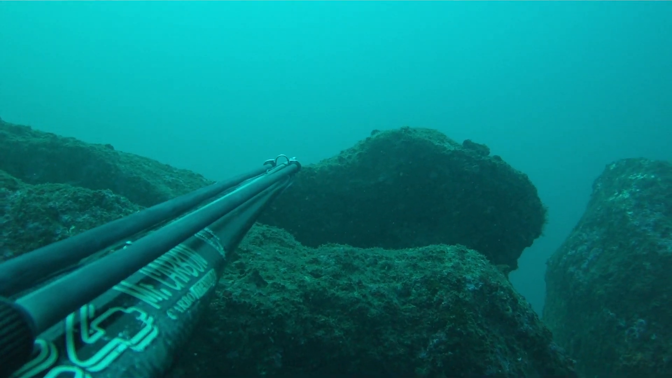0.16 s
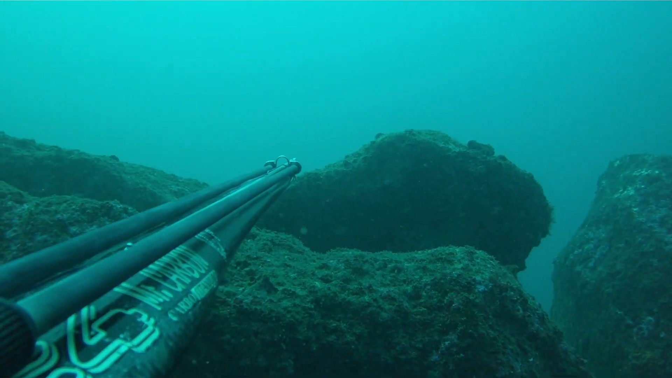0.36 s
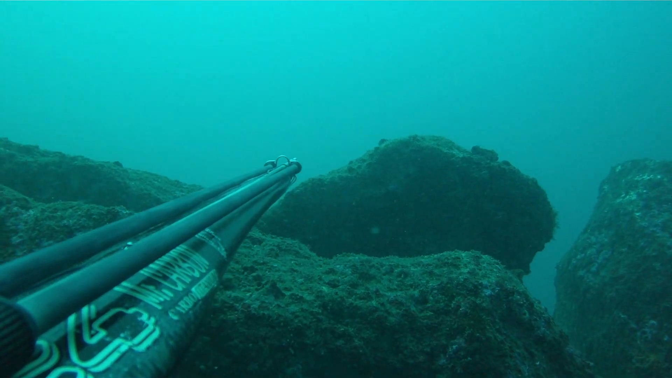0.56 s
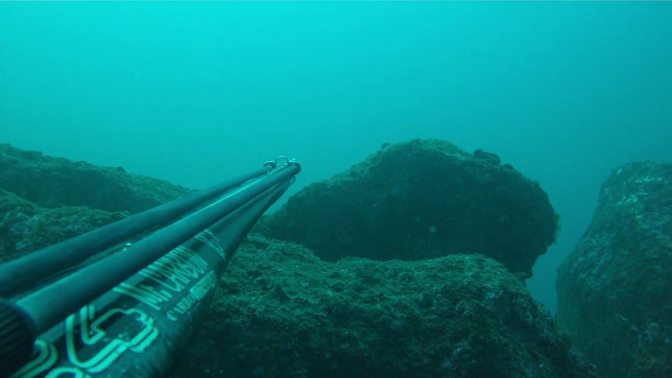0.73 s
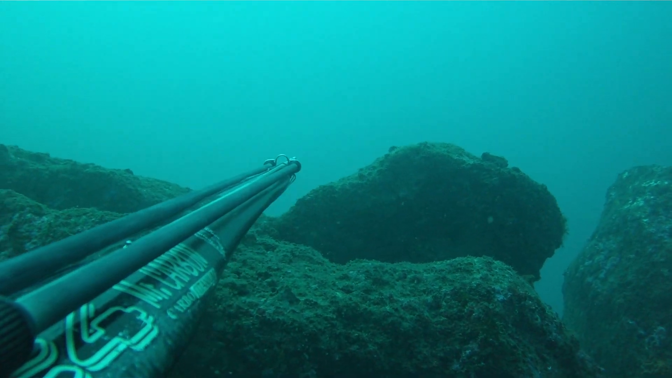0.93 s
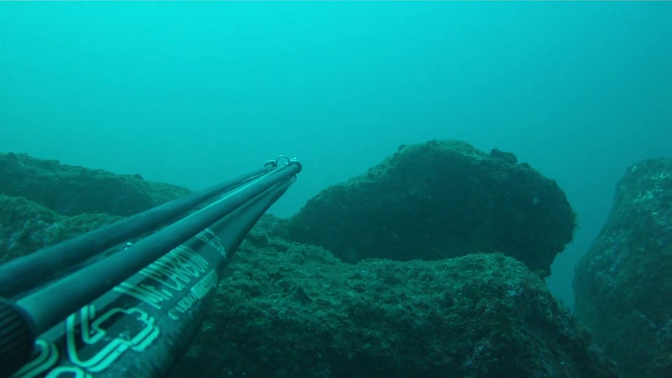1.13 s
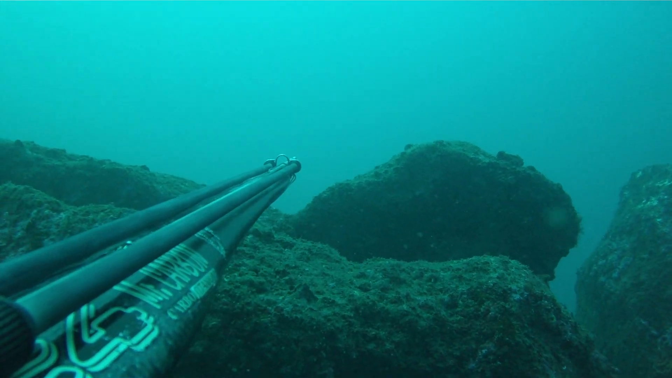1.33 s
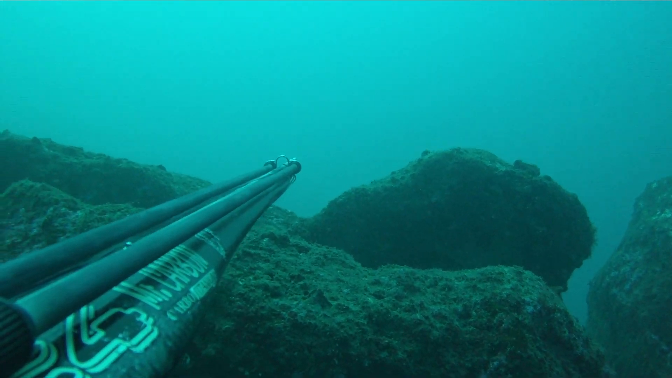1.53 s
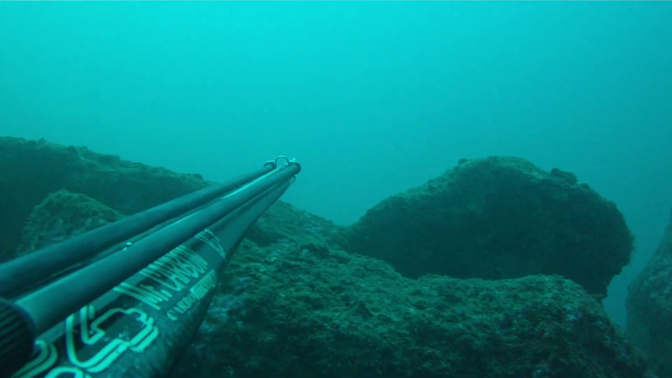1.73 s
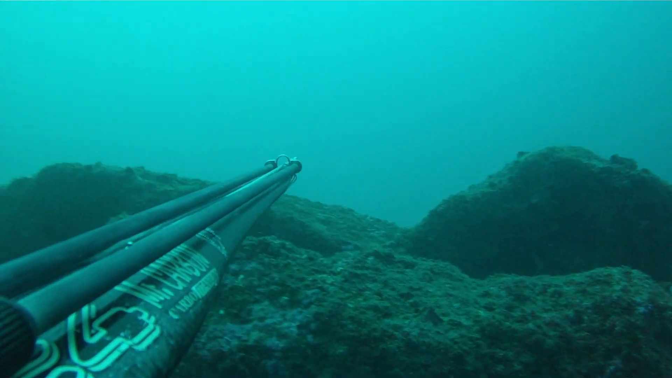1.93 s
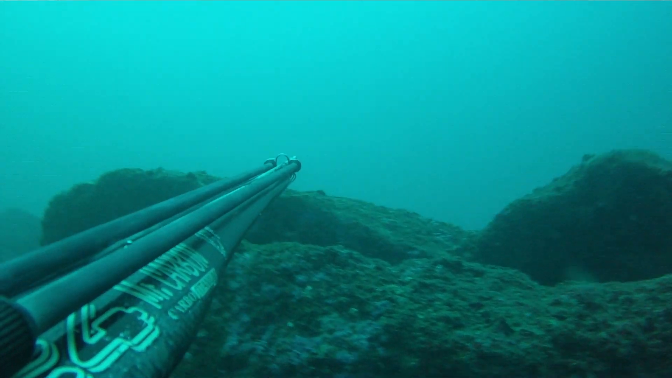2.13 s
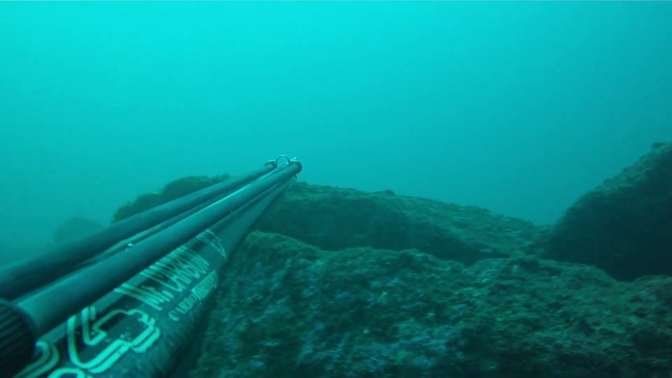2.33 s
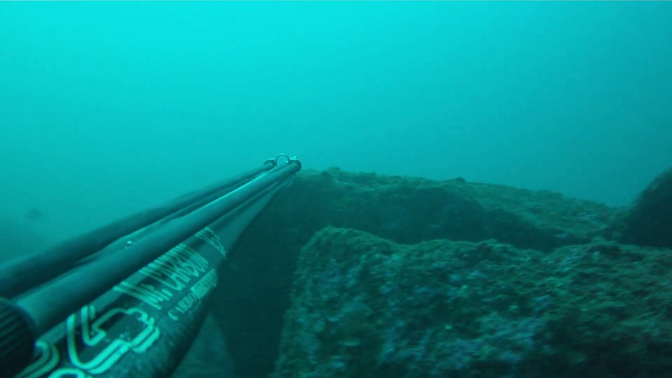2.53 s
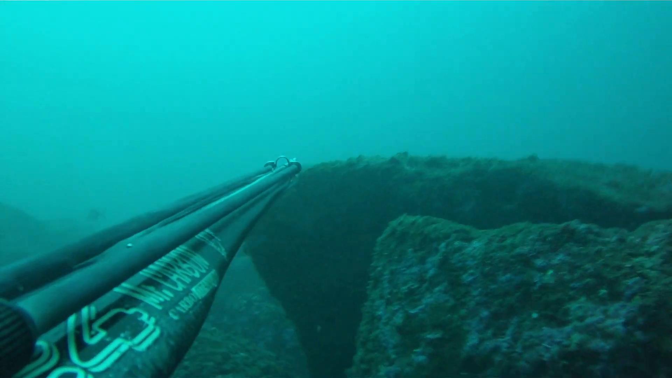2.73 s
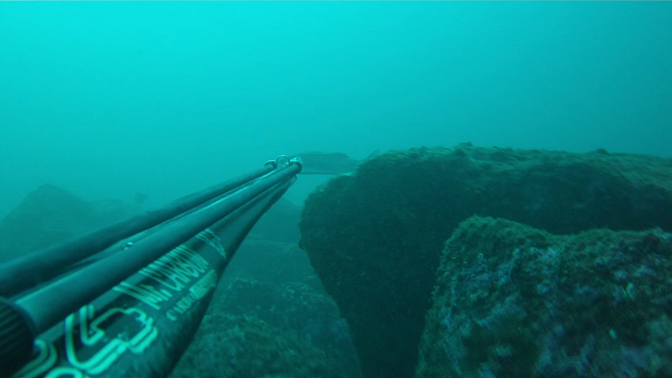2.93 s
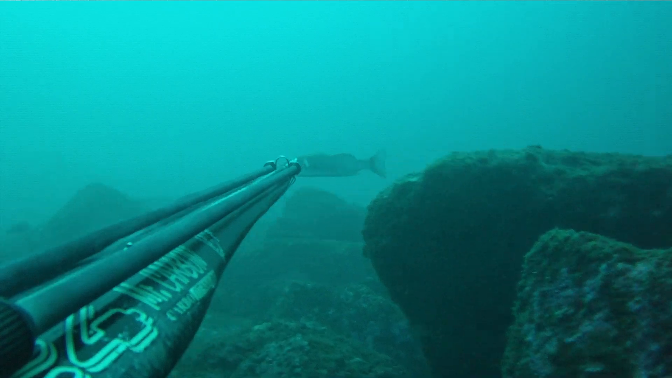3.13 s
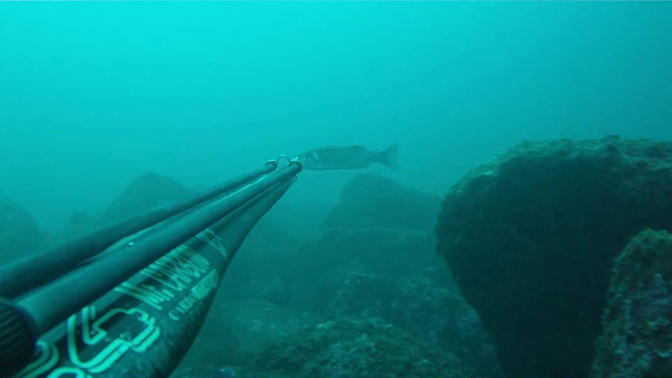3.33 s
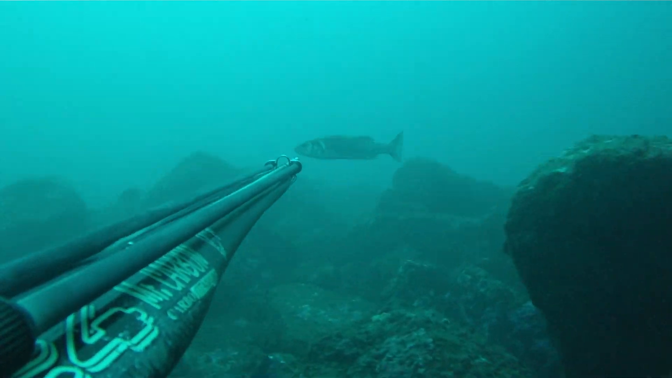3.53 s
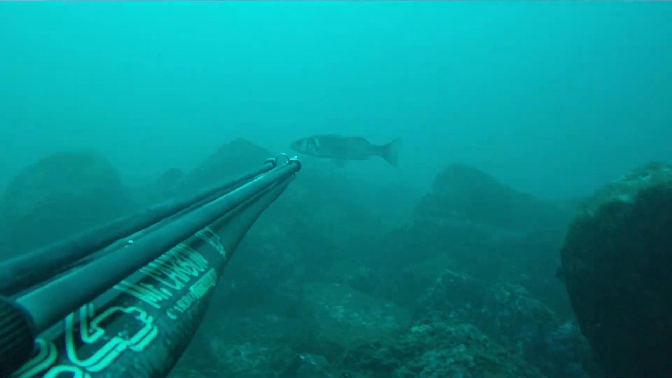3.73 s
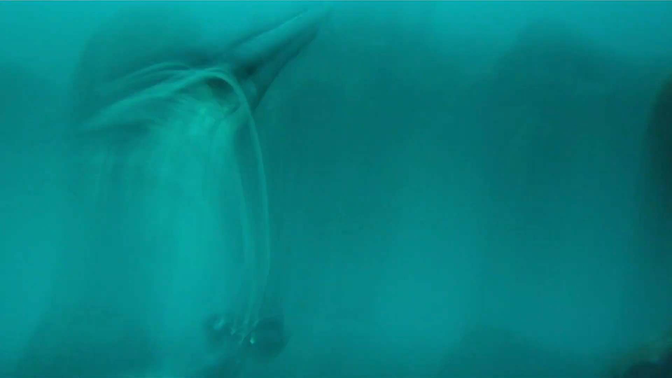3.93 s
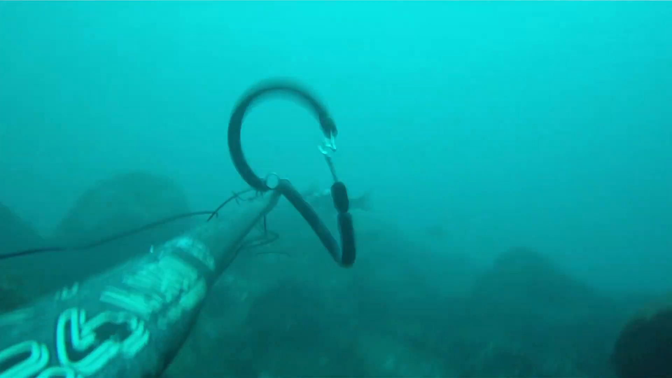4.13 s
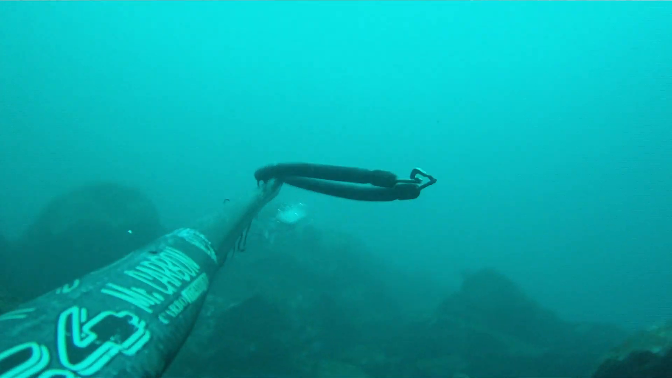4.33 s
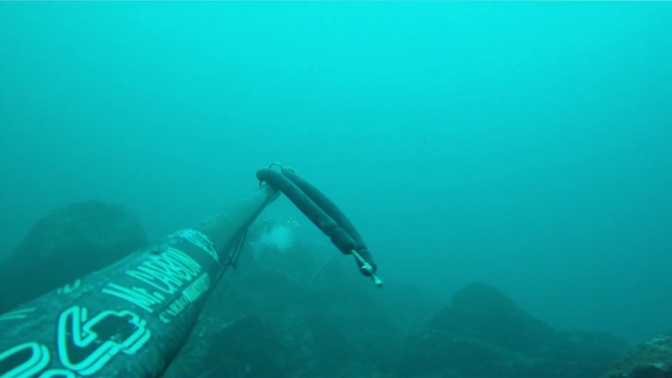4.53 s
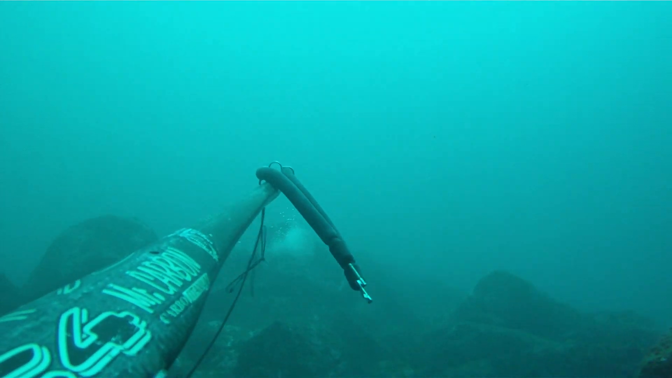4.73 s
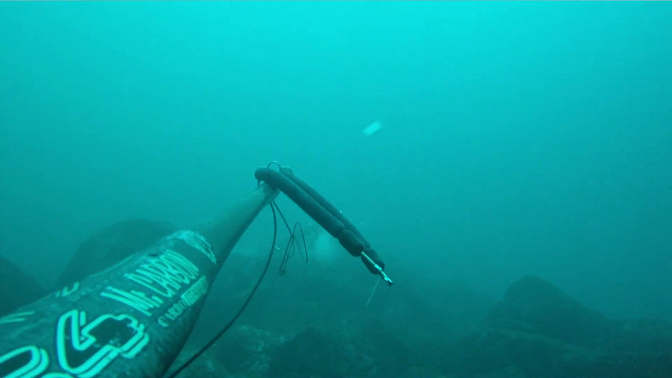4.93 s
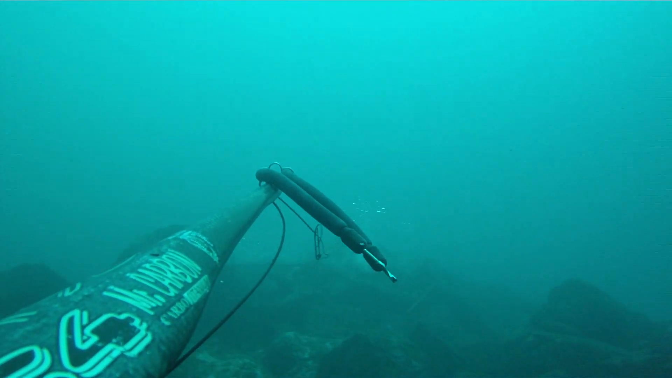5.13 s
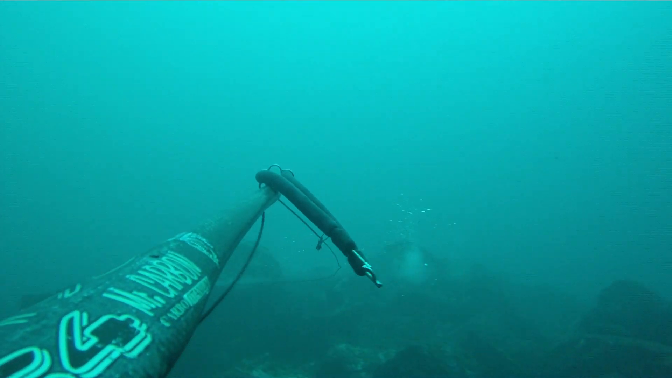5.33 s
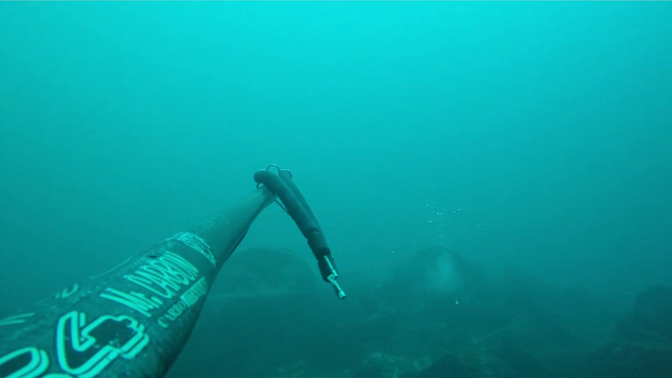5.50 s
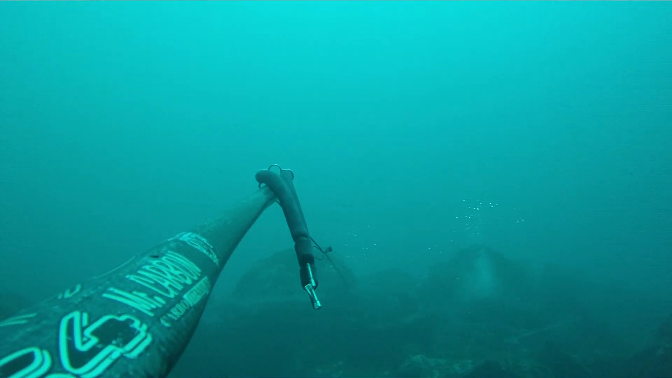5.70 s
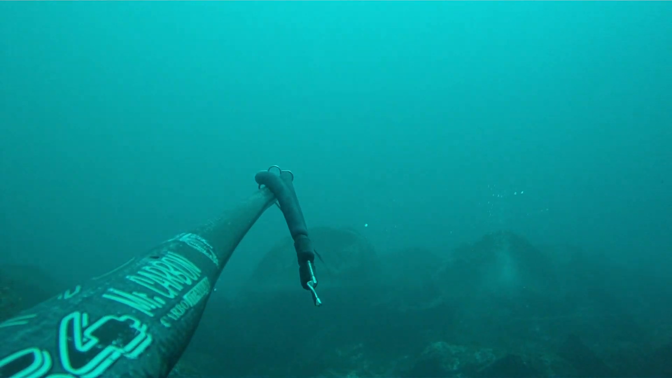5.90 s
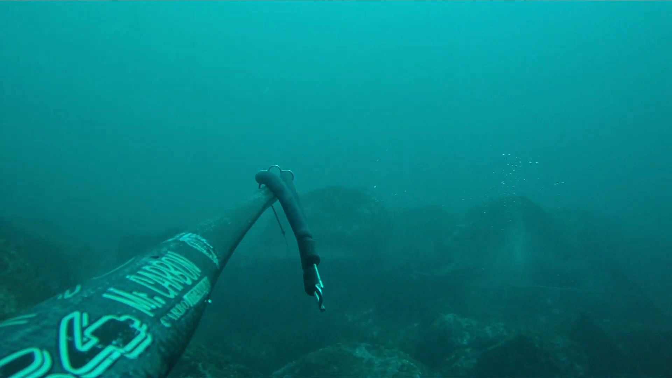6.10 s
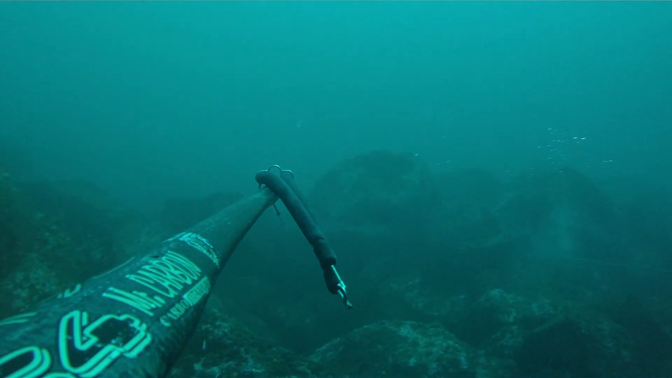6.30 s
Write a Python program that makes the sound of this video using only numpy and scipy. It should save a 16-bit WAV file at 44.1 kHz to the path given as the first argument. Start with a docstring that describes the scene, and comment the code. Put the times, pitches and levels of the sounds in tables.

```python
"""Over a rocky reef, inside a sealed camera housing fixed to a speargun that is aimed and fired.
Flickering sea hiss is noise coloured by the housing resonances; shrimp snaps are clicks into very short modes.
The mount's knocks and ticks are rough contacts that ring the housing, over soft thuds, rumble and electronic noise.
The shot overloads the microphone, which cuts in and out for a fifth of a second; the loudest knocks clip."""
import sys
import numpy as np
from scipy import signal
from scipy.fft import rfft, irfft
from scipy.io import wavfile
from scipy.ndimage import uniform_filter1d

SR = 44100
rng = np.random.default_rng(int(sys.argv[2]) if len(sys.argv) > 2 else 0)


def master(y):
    """Save y as 16-bit WAV."""
    cut = np.clip(np.atleast_2d(y).T, -1, 1)
    pcm = np.round(cut * 32767)  # scale
    wavfile.write(sys.argv[1], SR, pcm.astype(np.int16))


N = 284886

# Table levels are those before the treble notch of the microphone port.
# background settings: (time [s], sea hiss [dB], sea treble [dB], electronic hiss [dB]);
# the last two are settings that their sources offset
BACKGROUND = [(0, -39, -51.5, -64), (1.15, -38.5, -51, -63.5), (1.7, -35.5, -55, -65.5),
              (2.05, -36.5, -55, -64.5), (2.3, -38.5, -56, -68), (3.3, -39, -64.5, -73),
              (3.4, -40, -57.5, -73.5), (3.75, -35.5, -53.5, -70), (3.92, -37.5, -60.5, -82.5),
              (4.7, -37, -59.5, -87.5), (5.18, -41.5, -60, -80), (5.3, -38.5, -56.5, -74),
              (5.6, -36.5, -51, -66), (6.46, -33.5, -49, -63.5)]
# colour of the sea noise: (frequency [Hz], relative level per Hz [dB])
SEA_COLOUR = [(200, -41.5), (400, -14), (600, -17), (900, -5.5), (1200, 3.5), (1700, -1.5), (2050, -30.5),
              (2400, -29), (3100, -37.5), (4500, -32.5), (6000, -28.5), (7000, -39), (8500, -65)]
# housing resonances heard in the sea noise: (frequency [Hz], width [Hz], lift [dB])
SEA_PEAKS = [(820, 22, 4.5), (1259, 49, 11), (1252, 8.5, 5), (1570, 65, 9), (1753, 330, 12),
             (2272, 120, 10.5), (2953, 220, 9), (3750, 970, 5.5), (5470, 160, -4.5)]
# nearest shrimp snaps: (time [s], strength before the modes ring [dB])
NEAR_SNAPS = [(0.011, -35.5), (0.3294, -38.5), (0.6298, -33), (0.756, -40.5), (0.8366, -39), (0.9949, -40),
              (1.1703, -38.5), (1.2117, -29), (2.0398, -36.5), (2.095, -40), (4.824, -38), (5.7718, -35),
              (5.806, -42), (5.8811, -37.5), (5.9244, -38), (6.202, -39)]
# short ringing of every snap: (frequency [Hz], level [dB], 60 dB decay [s])
SNAP_MODES = [(2180, 5.5, 0.002), (3780, -2.5, 0.011), (5210, 4, 0.0033), (6340, -12.5, 0.0028)]
# knocks on the housing: (time of the strongest part [s], peak of the ringing [dB], contact length [ms],
# lift of the modes below and above the middle ones [dB])
KNOCKS = [(0.0083, -19.5, 21, 0), (0.0337, -16.5, 3.5, -2), (0.058, -23, 6.2, -6), (0.3774, -13.5, 10, -8),
          (0.545, -25, 7.6, -5.5), (0.7339, -22, 13, 1), (0.8718, -15.5, 4.6, -1), (0.8964, -21, 7, -4),
          (1.226, -7.5, 9.8, 9), (1.2487, -3.5, 4.4, -7), (1.3129, 0, 7.4, 2), (1.4423, -5, 6, -5.5),
          (1.5646, -9.5, 11, -0.5), (1.602, -16, 13, 9), (1.6423, 0, 3.9, -4.5), (1.6745, -13.5, 5.3, 11),
          (1.691, -0.5, 4.9, -3), (1.7349, -14, 3.2, 11), (1.746, 3, 8, 11.5), (1.8268, -8.5, 4.1, -1),
          (1.8346, -17.5, 15, 3), (1.8705, -8, 4.7, -12), (1.897, -20, 5.6, -1), (1.9474, -15, 12, 6),
          (1.9779, -4.0, 5.6, -14), (2.0697, -16, 29, -4), (2.126, -6, 8, -4), (2.1356, 4, 2.3, -3),
          (2.1426, -2, 2.85, 0.5), (2.1862, 5.0, 8, 6.5), (2.2366, -16, 10, -7), (2.2508, 3, 8.4, -1.5),
          (2.2595, -17, 21, -6), (2.2965, 0.5, 13, 0), (2.3344, -9.5, 6.6, 4), (2.3389, -11, 21, -2),
          (2.355, -7, 2.9, -1), (2.385, -8.5, 9.9, 2), (2.4227, 2, 10.3, 2.5), (2.464, -20, 5.3, 5),
          (2.478, -4.5, 18.2, -5), (2.528, -8.5, 9.7, -1), (2.5375, -7, 8.7, 2), (2.5634, -21, 17, -2.5),
          (2.5954, -6.5, 11.3, -2), (2.6315, -0.5, 14.7, -5), (2.6448, -4, 16.6, -3), (2.687, 0.5, 9.9, 8),
          (2.7393, -0.5, 8.6, -10.5), (2.7842, -7.5, 9.1, 4), (2.8229, 2.5, 9.8, 3), (2.8693, 0, 6.9, 10.5),
          (2.9296, -11, 3.9, 4), (2.962, -9.5, 6.8, 10), (2.9756, -5, 6.6, -4), (3.0073, 6.5, 6.34, 11),
          (3.044, -2.5, 3.8, -3), (3.0536, -12, 13, 15), (3.0852, 4, 9.9, 2), (3.1367, -7.5, 7, 8),
          (3.1771, -10.5, 8, -1), (3.189, 0.5, 4.1, 7.5), (3.2256, -7, 8.8, -4), (3.2683, 5, 10.8, 4.5),
          (3.3178, 0.5, 10.5, 4.5), (3.5096, -12, 6.9, -1.5), (3.5537, -3.5, 6.1, -2), (3.592, -7, 13, -6),
          (3.6104, -12, 7.0, -6), (3.6484, -4, 9, 7), (3.6841, -13, 5.1, -8), (3.698, -8.5, 6.8, -5),
          (3.7475, 1, 8.4, 4.5), (3.7832, 1, 8, 5.5), (3.8317, 1.5, 9.3, 12.5), (3.8722, 1.0, 8.8, 5),
          (3.9815, -5.5, 4.6, -2), (4.0125, -11.5, 5.9, -10.5), (4.2514, -1, 4.4, -6),
          (4.3175, -10.5, 7.1, -0.5), (4.377, -8, 5.4, -12), (4.383, 1.5, 9.3, -1.5), (4.4232, -2, 10, -1),
          (4.4911, 2.5, 4.4, -19), (4.56, -11.5, 5.9, 1.5), (4.5724, -15.5, 17, -3), (4.5957, 0.5, 3.7, 0),
          (4.6458, -12.5, 8, 1), (4.6824, -14, 3.8, 2), (4.7352, -14, 5.1, 6), (4.7437, -9, 5.8, 3.5),
          (4.7848, -18.5, 10, -1), (4.7934, -12, 7.5, -2), (4.8393, 3, 5.8, 6.5), (4.8732, -21, 5.9, -15),
          (4.953, -10.5, 1.75, -1), (4.9702, -17.5, 4.6, 3), (5.0115, -2.5, 3.8, -6.5),
          (5.0811, -17.5, 3.9, 4), (5.2107, -7.5, 4.4, -2.5), (5.236, -20, 5, -0.5), (5.318, -21, 14, -3),
          (5.338, -16, 4.5, -8), (5.3652, -11.5, 4.5, -4.5), (5.38, -8, 6.6, 1), (5.4341, -20, 9.3, -9),
          (5.4657, -13, 7.6, -3), (5.4736, -5.5, 9, -5), (5.4873, -16.5, 5, -4), (5.5278, -13, 5.2, -2),
          (5.5731, -2.5, 9.5, 11), (5.5879, -8.5, 8.5, -9), (5.6506, -15.5, 8.4, -19), (5.6707, -17, 7, -8),
          (5.6906, -2.5, 5.7, 0), (5.99, -19.5, 21, 10), (6.004, -18.5, 29, 7), (6.016, -19, 13, -12),
          (6.0352, -26.5, 25, 12)]
# ringing of the housing, before chance shifts: (frequency [Hz], level [dB], 60 dB decay [s])
HOUSING_MODES = [(283, -9.5, 0.12), (395, -14.5, 0.12), (484, -7.5, .035), (642, -13.5, 0.097),
                 (819.5, -6.5, 0.074), (1046, -15.5, 0.15), (1163.5, 2.5, 0.068), (1299, -1, 0.047),
                 (1397.5, 15.5, 0.022), (1577, 0, 0.025), (1624.6, 3, 0.037), (1680, -11.5, 0.024)]
# low thuds of the whole gun: (time, 6.5 ms ahead of the onset [s], peak of the swell [dB], starting pitch [Hz])
THUDS = [(0.019, -45, 190), (0.374, -42.5, 130), (0.665, -49, 200), (0.723, -48, 80), (0.771, -45.5, 240),
         (0.86, -41.5, 194), (1.24, -29.5, 106), (1.631, -29, 105), (1.966, -41, 239), (2.124, -32.5, 208),
         (2.408, -34, 203), (2.631, -33, 202), (2.963, -34, 160), (3.543, -35.5, 169), (3.633, -35.5, 159),
         (4.061, -21, 230), (4.421, -36, 104), (4.999, -40, 106.7), (5.367, -38.5, 97.5), (5.47, -41, 184),
         (5.565, -31.5, 155), (5.678, -31, 106), (6.159, -42.5, 178)]
# stretches where the microphone passes the shot:
# (start [s], length [ms], level setting [dB], favoured pitch [Hz], clatter before saturation [dB])
SHOT_STRETCHES = [(4.0525, 10, 6, 1450, -11), (4.065, 7, 5, 1550, -14), (4.0725, 26, -4, 1500, -11),
                  (4.1, 1.2, -7, 1400, -10), (4.1143, 9.5, -10, 1550, -6), (4.13, 7, -7, 1050, -12),
                  (4.1395, 7.5, -4.5, 1650, -13), (4.1595, 3.7, -8.5, 1650, -24),
                  (4.165, 3.2, -15, 1650, -22), (4.1773, .9, -16, 1400, -10), (4.1805, 2.5, -12, 1450, -12),
                  (4.189, 4.5, -18, 1350, -22), (4.194, 4, -10, 1700, -26), (4.2, 14, -15, 1700, -33),
                  (4.2165, 3, -16, 1400, -12), (4.237, 12.5, -15.5, 1300, -36)]
# drop of sea, snaps, knocks, thuds and rumble around the shot: (from [s], to [s], level [dB])
CUT_OUT = (4.053, 4.237, -28)

TREBLE_FROM_HZ = 2050   # the sea noise splits here into wash and fizz
FAR_SNAPS_PER_S, FAR_SNAPS_DB = 300, -0.5   # smallest far snap re the sea treble setting, before its modes
WHINE_HZ, WHINE_DB = 7865, -7.5   # level re the electronic hiss setting
GRIT_DB, GRIT_SPREAD_DB = -40, 8.5   # scrape in each knock, re its peak
TILT_SPREAD_DB = 3   # chance lean of a knock towards its low or high modes
TICK_COUNT, TICK_MS = 150, 6   # contact length
TICK_DB, TICK_SPREAD_DB = -26, 7.5   # level re the knock before, and most it strays either way
TICK_WAIT_S = 0.03   # mean chance wait, on top of a fixed half of it
THUD_T60_S = 0.1
RUMBLE_DB, SHAKEN_RUMBLE_DB = -60.5, -26.5   # steady level; shaken part re the smoothed rattle
SHOT_FOCUS_DB = 110   # fall of the modes per octave from the favoured pitch
DRIVE_DB, DRIVE_PER_DB = 4, 0.45   # the capsule is driven harder in the louder stretches
NOTCH_HZ, NOTCH_WIDTH_HZ = 9220, 12600
CUTOFF_HZ = 15900


def from_db(db):
    """Decibels to gain."""
    return 10 ** (np.asarray(db) / 20)


def rms_one(x):
    """Scale to rms 1."""
    return x / np.sqrt(np.mean(x ** 2) + 1e-20)


def in_time(rows):
    """Draw each column as a curve over every sample."""
    s, *columns = np.transpose(rows)
    return [np.interp(np.arange(N) / SR, s, column) for column in columns]


def drift(rate_hz):
    """Smooth chance wander of rms 1: twice low-passed noise, made at every 40th sample."""
    r = np.exp(-80 * np.pi * rate_hz / SR)
    noise = rng.standard_normal(N // 40 + 2002)
    slow = signal.lfilter([1], [1, -2 * r, r * r], noise)[2000:]   # skip the filter's start
    return np.interp(np.arange(N) / 40, np.arange(len(slow)), rms_one(slow))


def ring(force, hz, t60):
    """Resonator: a unit click starts a decaying sine of height 1."""
    r, w = from_db(-60 / (t60 * SR)), 2 * np.pi * hz / SR
    return signal.lfilter([0, np.sin(w)], [1, -2 * r * np.cos(w), r * r], force + 1e-18)


def band(x, low_hz, high_hz, order):
    """Butterworth band-pass."""
    return signal.sosfilt(signal.butter(order, [low_hz, high_hz], "band", fs=SR, output="sos"), x)


def high_pass(x, hz):
    """Second-order Butterworth high-pass."""
    return signal.sosfilt(signal.butter(2, hz, "high", fs=SR, output="sos"), x)


def add(out, x, s):
    """Mix x into out from time s."""
    i = max(round(s * SR), 0)
    out[i:i + len(x)] += x[:N - i]


def sea(low_hz, high_hz, patchy_db):
    """Noise peaking on the housing resonances; it flickers, the whole band more slowly than its six parts."""
    hz = np.maximum(np.arange(N // 2 + 1) * SR / N, 1.0)
    colour_hz, colour_db = np.transpose(SEA_COLOUR)
    level_db = np.interp(np.log(hz), np.log(colour_hz), colour_db)
    for peak_hz, width_hz, db in SEA_PEAKS:
        level_db = level_db + db / (1 + (2 * (hz - peak_hz) / width_hz) ** 2)
    spectrum = rfft(rng.standard_normal(N)) * from_db(level_db)
    out, surge = 0, drift(14)
    edges = np.geomspace(low_hz, high_hz, 7)
    for low, high in zip(edges, edges[1:]):
        part = irfft(spectrum * (hz >= low) * (hz < high), N)
        out = out + part * from_db(patchy_db * (surge + 1.93 * drift(37)))
    return rms_one(out)


def electronics(hiss_db):
    """Hiss that rises with pitch up to the high treble, and a thin steady-pitched whine."""
    hiss = rms_one(high_pass(rng.standard_normal(N), 9500))
    whine = np.sqrt(2) * np.sin(2 * np.pi * WHINE_HZ * np.arange(N) / SR)   # rms 1
    return from_db(hiss_db + 6.0) * hiss, from_db(hiss_db + WHINE_DB) * whine


def shrimp_snaps(treble_db):
    """Far snaps are chance clicks, near ones tiny noise bursts; both ring very briefly in varying colour."""
    sizes = from_db(2.2 * np.minimum(rng.exponential(1, N), 4)) * rng.choice([-1, 1], N)
    happens = rng.random(N) < FAR_SNAPS_PER_S / SR
    clicks = sizes * happens * from_db(treble_db + FAR_SNAPS_DB)
    for s, db in NEAR_SNAPS:
        i = round(s * SR)
        clicks[i:i + 60] += from_db(db - 6.5) * rng.standard_normal(60) * np.exp(-np.arange(60) / 25)
    out = 0
    for hz, db, t60 in SNAP_MODES:
        uneven = from_db(5.3 * drift(67))   # each mode is struck by its own amount
        out = out + from_db(db) * ring(clicks * uneven, hz, t60)
    return out


def knocks(rows):
    """Each knock is a rough contact that builds and fades, with its own balance of modes and some grit."""
    out, t = np.zeros(N), np.arange(3000) / SR
    hz, mode_db, t60 = np.transpose(HOUSING_MODES)[:, :, None]
    fading = from_db(mode_db - 60 * t / t60)
    for s, db, ms, outer_db in rows:
        # time from the hardest contact, in contact lengths
        phase = (t[:1800] - t[600]) * 1000 / max(ms, 1)
        build = np.exp(-(phase / 0.4) ** 2)
        fade = np.exp(-phase / 0.25) + 0.036 * np.exp(-phase / 10.0)
        pressure = np.where(phase < 0, build, fade)
        force = rng.standard_normal(1800) * pressure * np.hanning(1800) ** 0.27

        odd, detune = rng.standard_normal((2, len(HOUSING_MODES)))
        tilt, hard = rng.standard_normal(2)
        lean_db = TILT_SPREAD_DB * tilt
        balance_db = np.interp(hz[:, 0], [910, 1130, 1430, 1500],
                               [outer_db - lean_db, 0, 0, outer_db + lean_db])
        # each knock's modes are detuned a little by chance
        modes = np.sin(2 * np.pi * hz * (1 + 0.027 * detune[:, None]) * t) * fading
        ringing = from_db(balance_db + 2.2 * odd) @ modes
        body = band(signal.fftconvolve(ringing, force), 700, 1800, order=2)
        scrape = band(force, 870, 4400, order=3)

        peak = np.argmax(uniform_filter1d(body ** 2, 90))
        body /= np.abs(body).max()
        body[:1800] += from_db(GRIT_DB + GRIT_SPREAD_DB * hard) * scrape / np.abs(scrape).max()
        add(out, from_db(db) * body, min(s - peak / SR, (N - 1) / SR))
    return out


def settling_ticks():
    """The mount settles with faint ticks after knocks picked by chance: rows like those of the knocks."""
    pick, wait_luck, level_luck = rng.random((3, TICK_COUNT))
    s, db = np.transpose(KNOCKS)[:2, (pick * len(KNOCKS)).astype(int)]
    wait = TICK_WAIT_S * (0.5 - np.log(1 - wait_luck))
    level_db = db + TICK_DB + TICK_SPREAD_DB * (2 * level_luck - 1)
    return [(at, level, TICK_MS, 0) for at, level in zip(s + wait, level_db)]


def rumble(rattle):
    """Water along the housing rumbles as low noise, more for a moment after each knock."""
    hold = np.exp(-1 / (0.0089 * SR))
    shaken = signal.lfilter([1 - hold], [1, -hold], np.abs(rattle))
    level = from_db(RUMBLE_DB + 2.0 * drift(20)) + from_db(SHAKEN_RUMBLE_DB) * shaken
    return level * rms_one(band(rng.standard_normal(N), 44, 330, order=1))


def thuds():
    """The gun thuds softly in the hand: low sines that swell fast, decay and sink in pitch."""
    out, t = np.zeros(N), np.arange(9000) / SR
    swell = (1 - np.exp(-t / 0.00092)) * from_db(-60 * t / THUD_T60_S)
    for s, db, hz in THUDS:
        sinking = np.sin(2 * np.pi * hz * t * (1 - 0.95 * t))
        add(out, from_db(db) * sinking * swell / swell.max(), s + 0.0065)
    return out


def shot():
    """The released bands shake the housing; the capsule saturates unevenly and passes it only in stretches."""
    out, size = np.zeros(N), SR // 20
    for start, ms, level_db, pitch_hz, clatter_db in SHOT_STRETCHES:
        shaking, n = rng.standard_normal((2, size)), round(ms * SR / 1000)
        drive = from_db(DRIVE_DB + DRIVE_PER_DB * level_db)
        ringing = 0
        for hz, db, t60 in HOUSING_MODES:
            focus_db = -SHOT_FOCUS_DB * abs(np.log2(hz / pitch_hz))
            ringing = ringing + from_db(db + focus_db) * ring(shaking[0], hz, t60)
        ringing = rms_one(ringing)
        # the ringing's swells are mostly flattened, for an even level
        ringing /= np.abs(signal.hilbert(ringing)) ** 0.8 + 0.05
        clatter = rms_one(signal.lfilter([1], [1, -0.75], shaking[1]))
        # take a stretch where the ringing is well built up
        swing = drive * (ringing + from_db(clatter_db) * clatter)[-n - 300:-300]
        squeezed = (np.tanh(swing + 0.74) - np.tanh(0.3)) / np.tanh(drive)
        edge = np.minimum(np.minimum(np.arange(n), n - np.arange(n)) / (0.0005 * SR), 1)   # 0.5 ms fades
        add(out, edge * from_db(level_db) * squeezed, start)
    return high_pass(out, 380)


def port_notch(x):
    """The microphone port cancels a wide band in the treble."""
    return signal.lfilter(*signal.iirnotch(NOTCH_HZ, NOTCH_HZ / NOTCH_WIDTH_HZ, SR), x)


def scene():
    """Mix water, knocks, shot and hiss through the port notch, then lay the whine on top."""
    sea_db, treble_db, hiss_db = in_time(BACKGROUND)
    wash = from_db(sea_db) * sea(180, TREBLE_FROM_HZ, patchy_db=1.5)
    fizz = from_db(treble_db + 1.5) * sea(TREBLE_FROM_HZ, 9000, patchy_db=2.5)
    hiss, whine = electronics(hiss_db)
    rattle = knocks(KNOCKS) + knocks(settling_ticks())
    surroundings = wash + fizz + shrimp_snaps(treble_db) + rattle + rumble(rattle) + thuds()

    start, end, cut_db = CUT_OUT
    passed_db = np.interp(np.arange(N) / SR, [start, start + 0.002, end - 0.002, end], [0, cut_db, cut_db, 0])
    return (port_notch(from_db(passed_db) * surroundings + shot() + hiss) + whine)[None]


def record(dry):
    """Hard clipping just under full scale, then a steep low-pass takes the top off."""
    clipped = np.clip(dry, -0.97, 0.97)
    return signal.sosfilt(signal.cheby2(16, 50, CUTOFF_HZ, fs=SR, output="sos"), clipped)


dry = scene()
out = record(dry)
master(out)
```